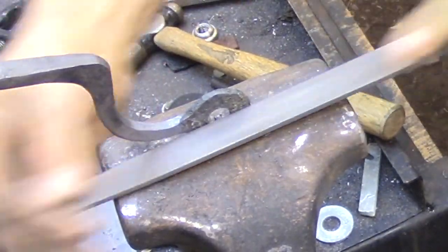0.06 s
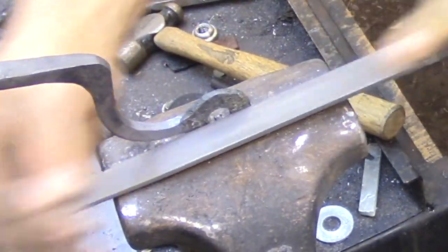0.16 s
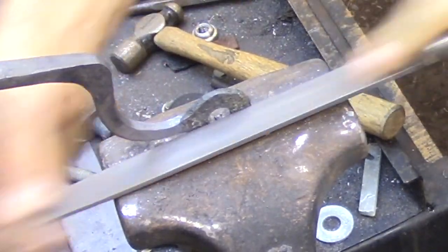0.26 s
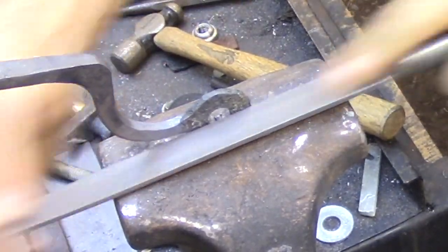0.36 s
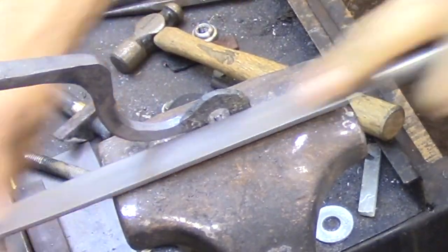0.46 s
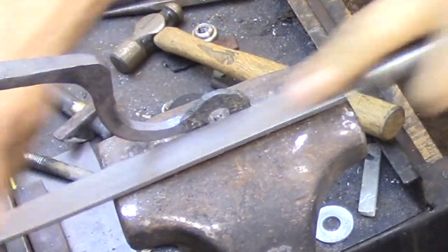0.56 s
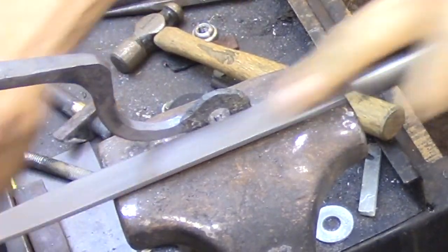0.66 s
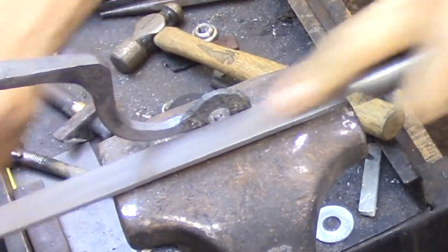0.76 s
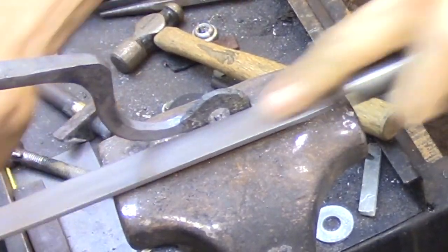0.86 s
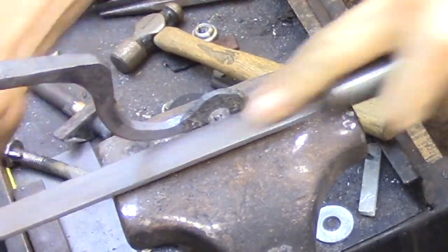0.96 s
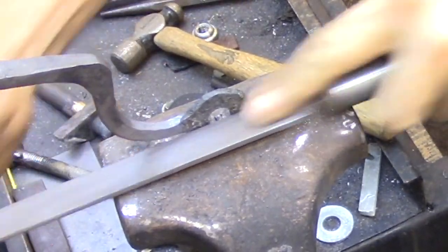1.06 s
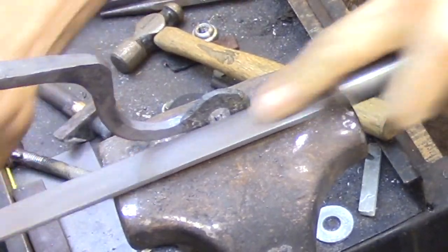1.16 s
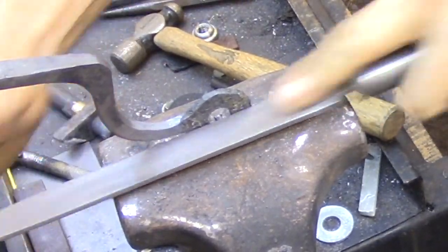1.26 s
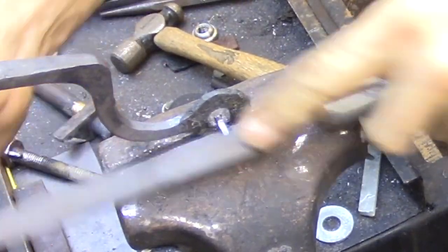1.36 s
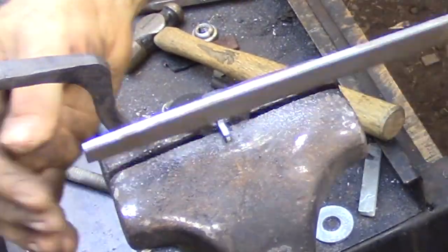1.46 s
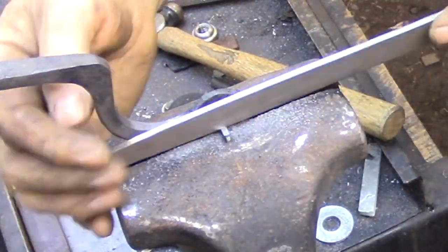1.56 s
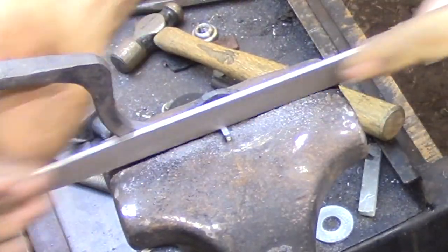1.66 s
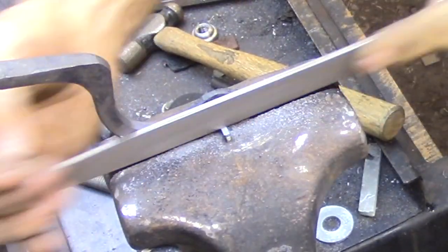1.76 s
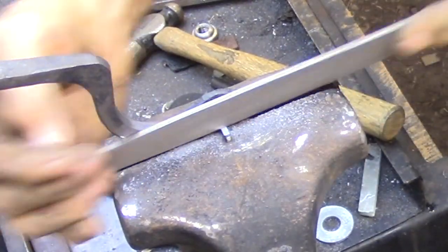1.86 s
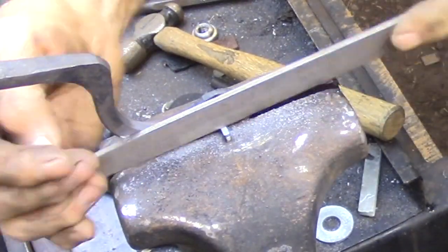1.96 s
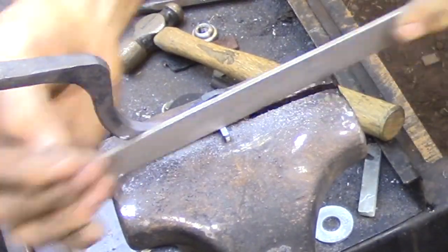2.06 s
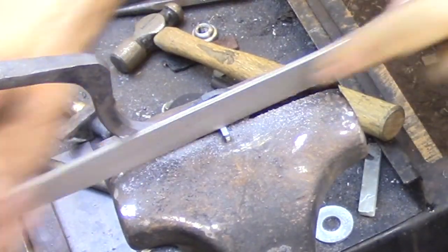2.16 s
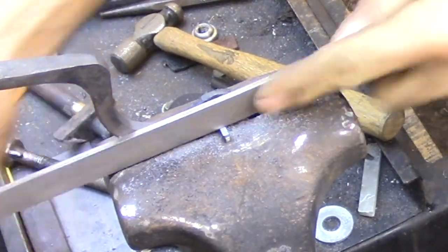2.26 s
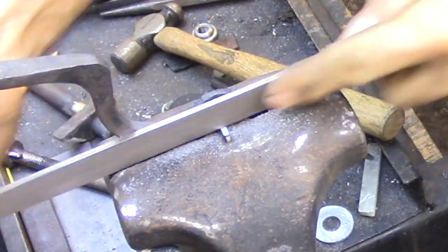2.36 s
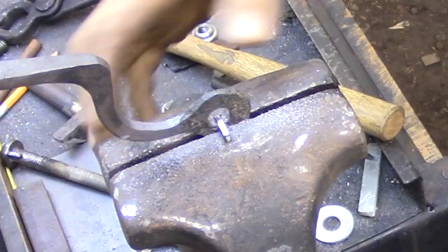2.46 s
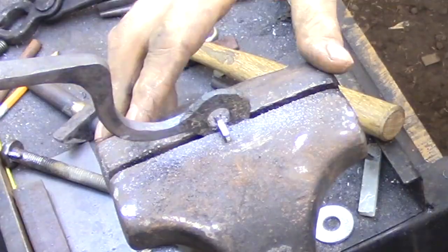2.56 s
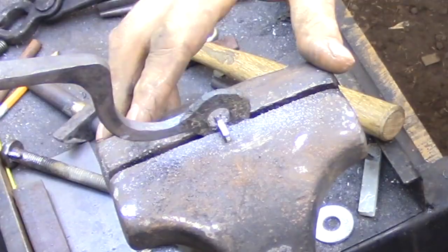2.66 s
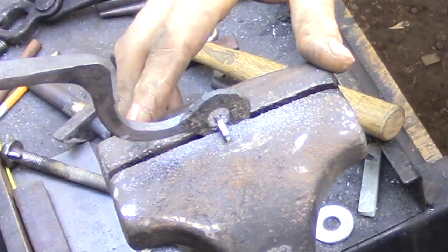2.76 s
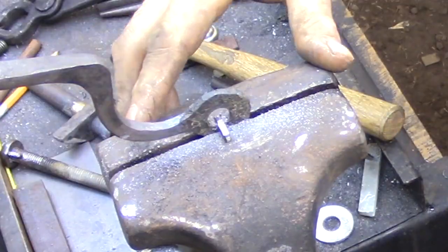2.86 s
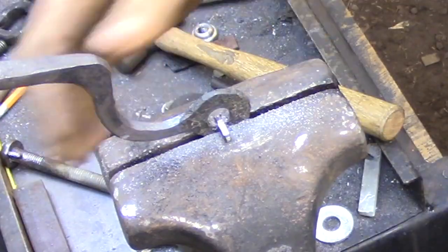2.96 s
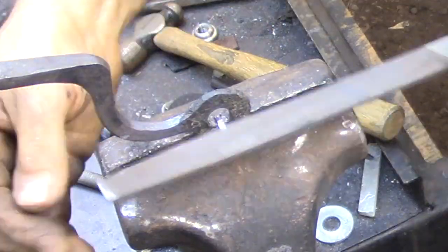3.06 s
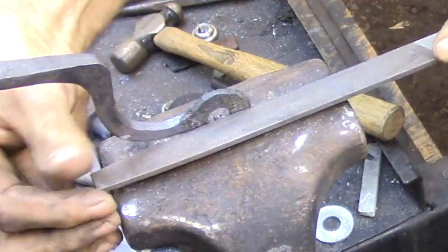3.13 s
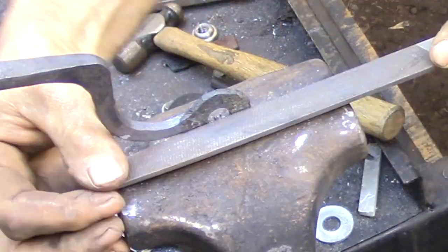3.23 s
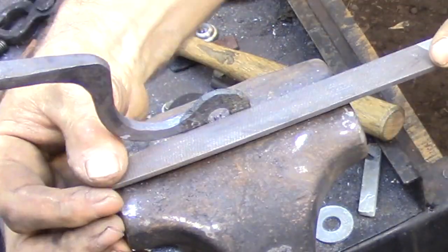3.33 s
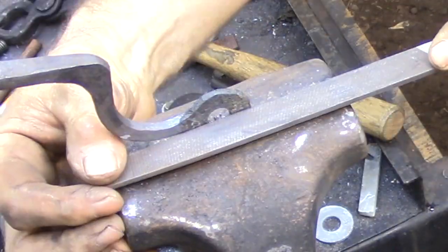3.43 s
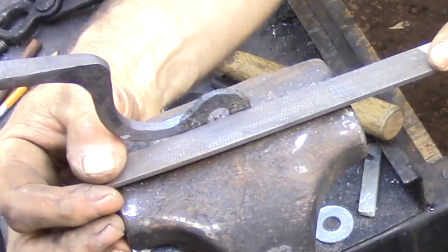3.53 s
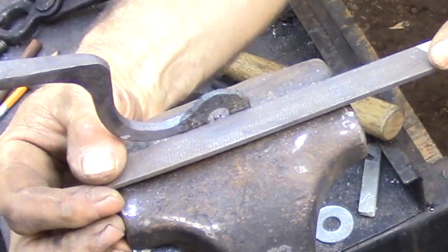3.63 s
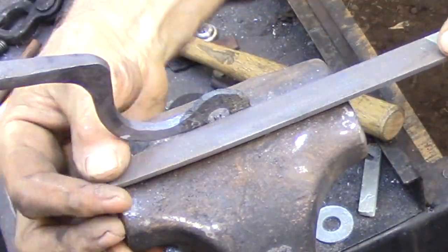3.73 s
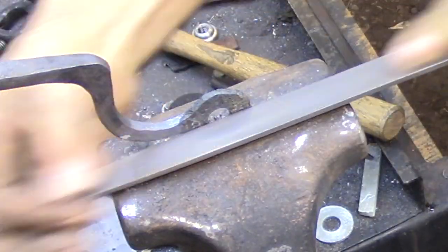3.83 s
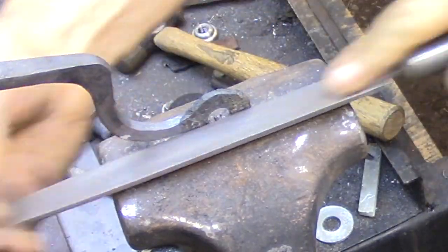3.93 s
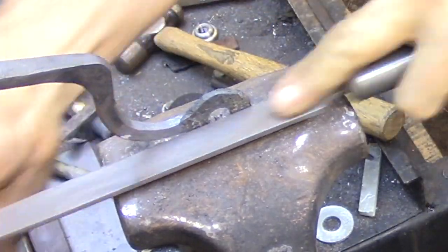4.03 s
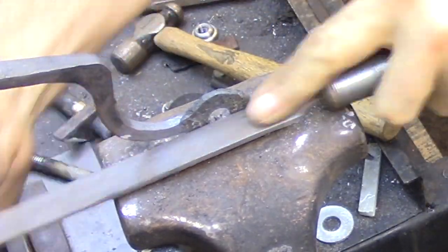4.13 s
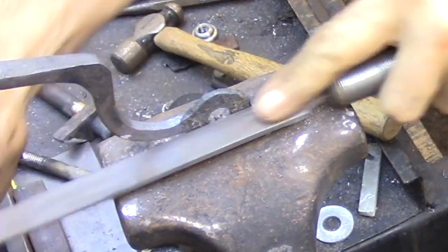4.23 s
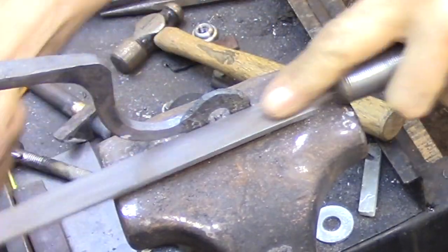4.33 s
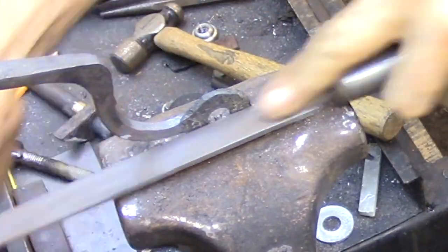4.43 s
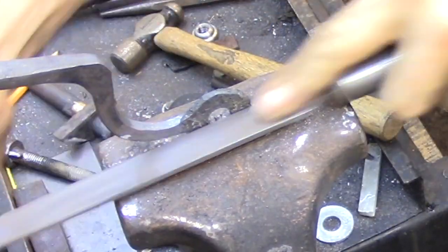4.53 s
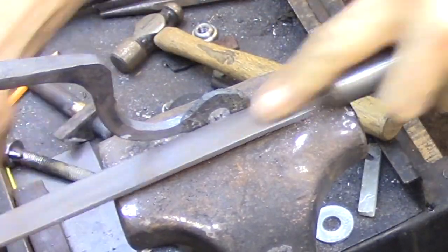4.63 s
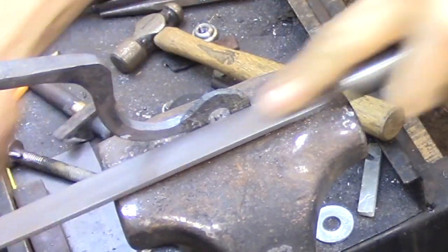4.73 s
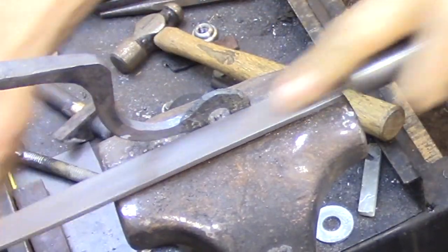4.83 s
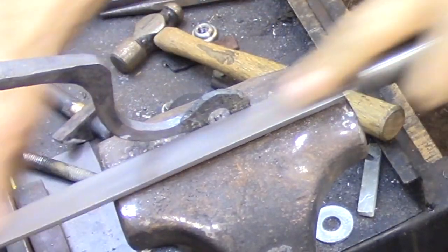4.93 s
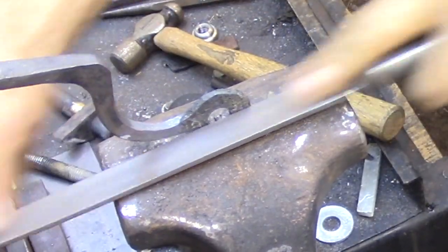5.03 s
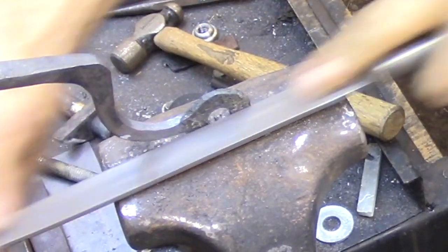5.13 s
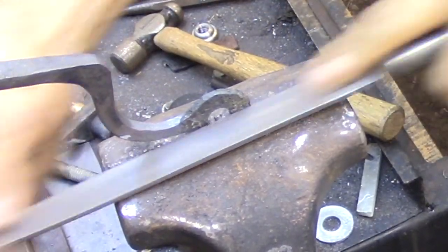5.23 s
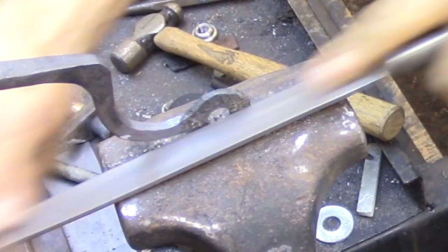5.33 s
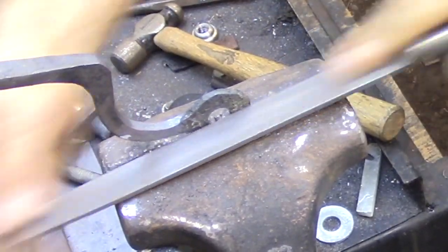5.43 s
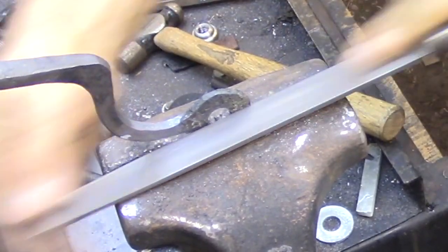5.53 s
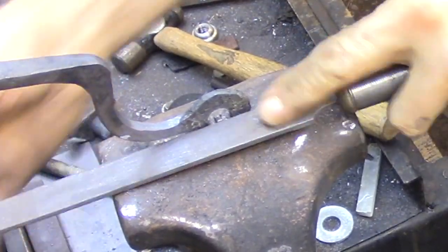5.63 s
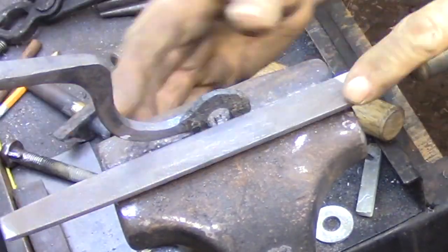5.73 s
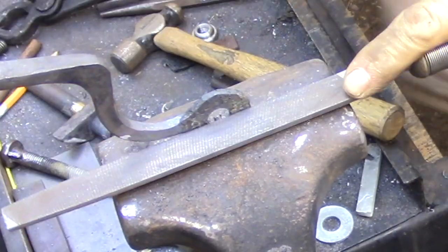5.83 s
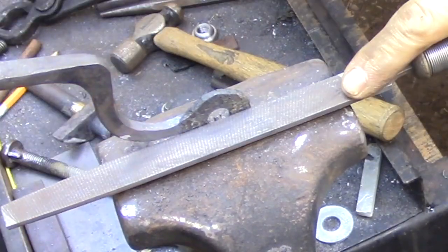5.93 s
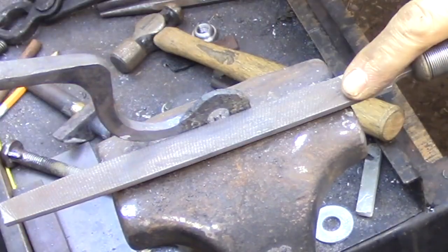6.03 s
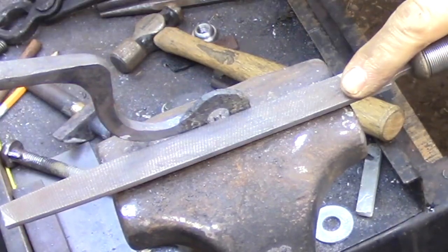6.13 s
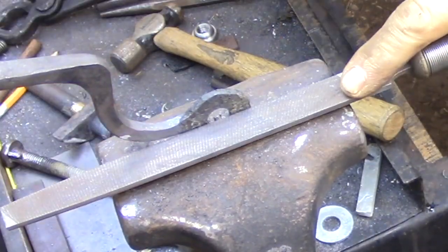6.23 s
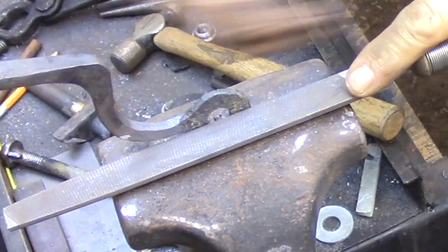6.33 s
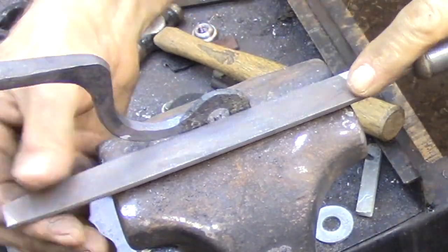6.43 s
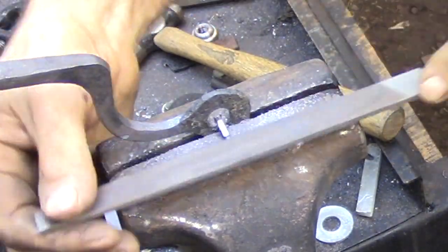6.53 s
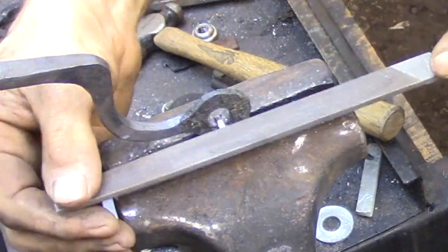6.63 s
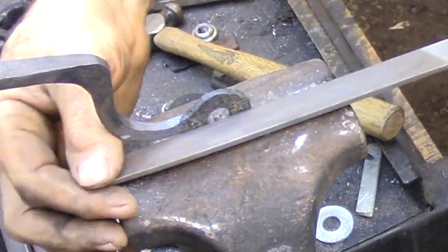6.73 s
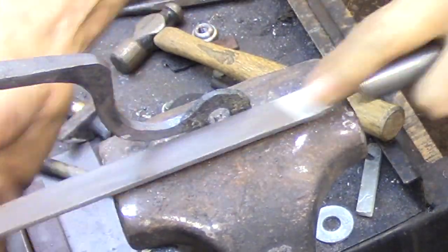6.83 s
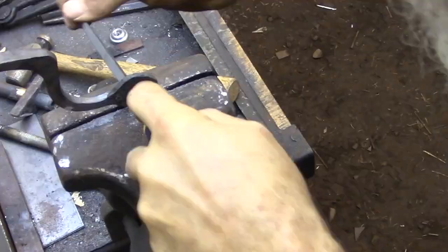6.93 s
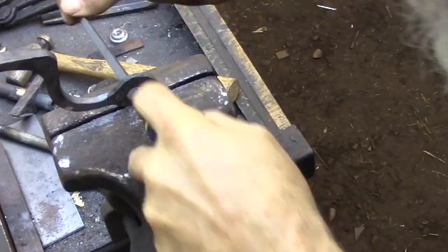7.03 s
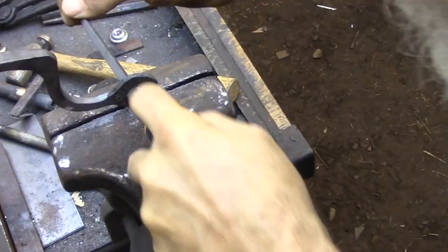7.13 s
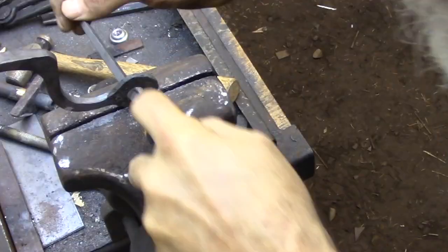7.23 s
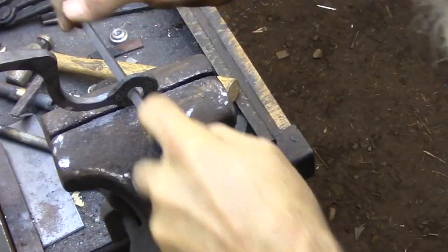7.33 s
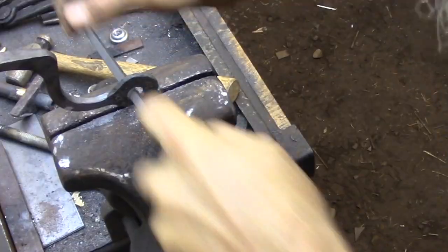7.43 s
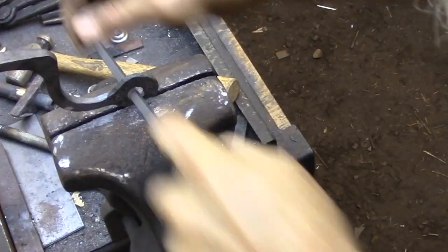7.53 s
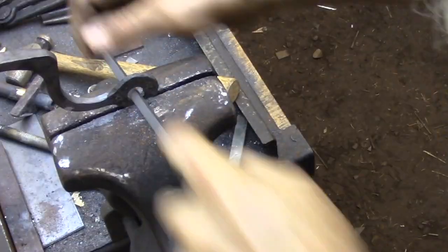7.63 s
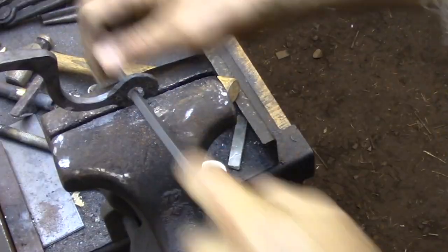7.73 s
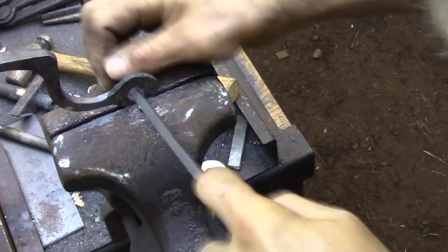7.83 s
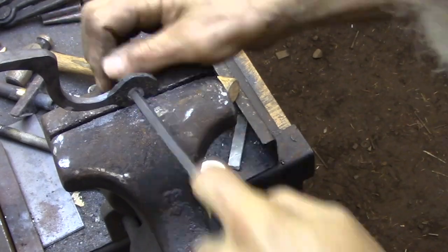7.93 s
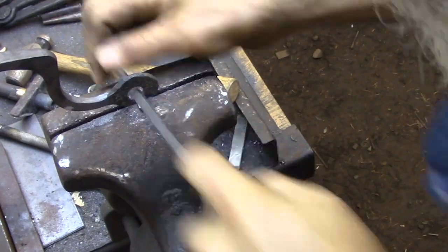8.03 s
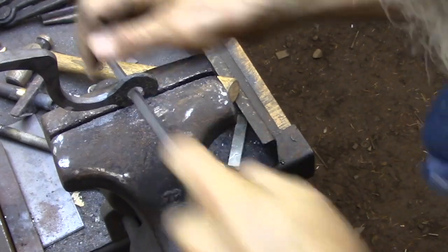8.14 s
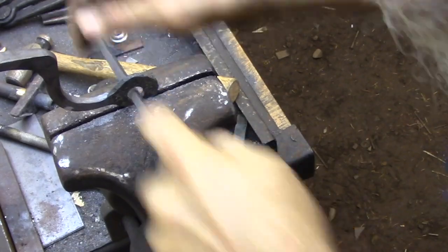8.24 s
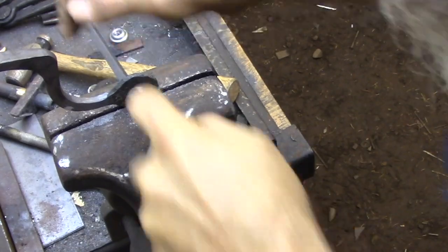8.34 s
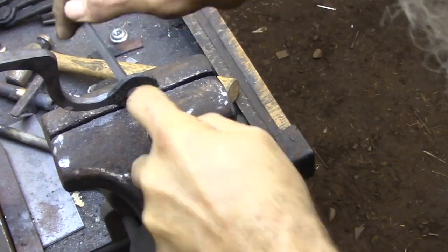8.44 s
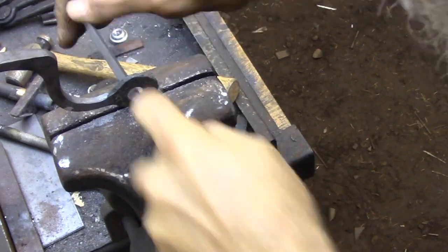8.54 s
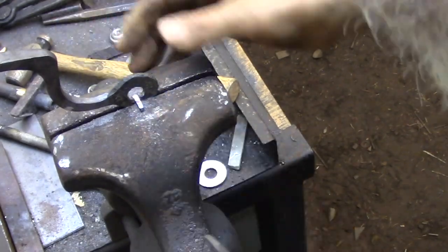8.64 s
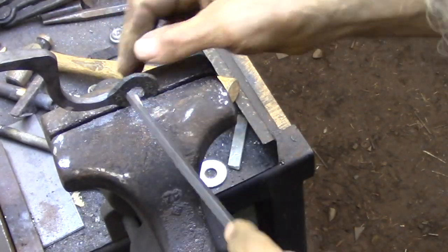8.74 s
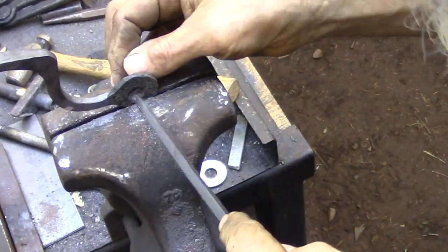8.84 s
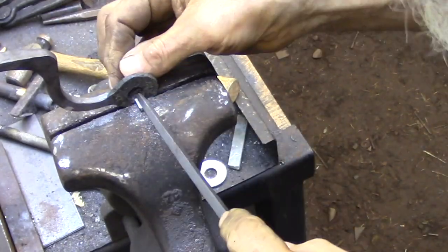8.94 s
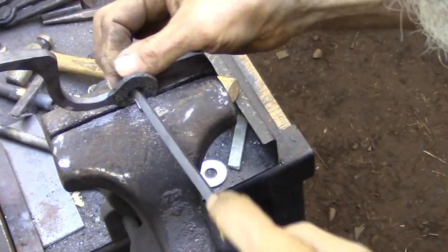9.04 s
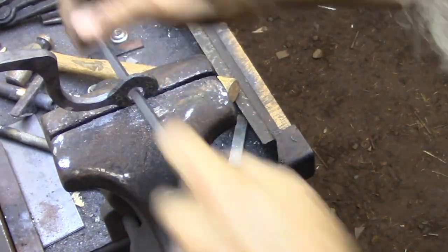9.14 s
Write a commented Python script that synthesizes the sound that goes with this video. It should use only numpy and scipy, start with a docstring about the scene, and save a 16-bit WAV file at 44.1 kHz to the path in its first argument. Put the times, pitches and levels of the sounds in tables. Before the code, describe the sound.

A flat file rasps fast back and forth on clamped iron over a humming motor, then a thin file makes the iron ring in sudden quiet.

```python
"""A flat file rasps quickly to and fro on forged iron in a vise, close to the microphone, over a humming motor.
Its runs are flat, tilted, then flat again; chatter squeaks in pitch and knocks on the iron break in.
The motor is suddenly gone around 7 s, as a thin needle file works the hole and makes the iron ring.
Filing is random bites and tooth whistle, shaped by strokes and filtered by the resonances of file and iron;
knocks are decaying modes and noise, the motor sine lines and noise, the quiet shop faint whine and air."""
import sys
import numpy as np
from scipy import signal
from scipy.fft import rfft, irfft, next_fast_len
from scipy.io import wavfile
from scipy.ndimage import map_coordinates

SR = 44100
rng = np.random.default_rng(int(sys.argv[2]) if len(sys.argv) > 2 else 0)


def generate_wav(sig):
    """Save sig (samples, or channels by samples) to the path in sys.argv[1] as 16-bit PCM at SR."""
    pcm = np.round(np.clip(np.atleast_2d(sig).T, -1, 1) * 32767).astype(np.int16)
    wavfile.write(sys.argv[1], SR, pcm)


N = 405279


def amp(db):
    """Decibels to gain."""
    return 10 ** (np.asarray(db) / 20)


def unit(x):
    """Scale to rms 1."""
    return x / np.sqrt(np.mean(x ** 2) + 1e-20)


def curve(rows):
    """Rows of seconds and value, as one value per sample."""
    return np.interp(np.arange(N) / SR, *np.transpose(rows))


def wobble(rate, size=N):
    """A smooth random curve with rate knots a second."""
    knots = rng.standard_normal(int(size * rate / SR) + 4)
    return map_coordinates(knots, [np.arange(size) * rate / SR])


def add(track, s, sound):
    """Mix a sound into a track at s seconds."""
    part = track[max(round(s * SR), 0):][:len(sound)]
    part += sound[:len(part)]


def body(x, colour, modes=(), size=8192):
    """Minimum-phase filter: a broad colour with ringing resonances on top."""
    hz = np.fft.rfftfreq(size, 1 / SR)
    colour_hz, colour_db = np.transpose(colour)
    db = np.interp(np.log(hz + 1), np.log(colour_hz), colour_db)
    db = db + sum(height / (1 + (2 * (hz - centre) / width) ** 2) for centre, width, height in modes)
    # folding the cepstrum forward makes the filter causal
    cepstrum = irfft(np.log(amp(db)))
    cepstrum[1:size // 2] *= 2
    cepstrum[size // 2 + 1:] = 0
    impulse_response = irfft(np.exp(rfft(cepstrum)))
    return signal.oaconvolve(x, impulse_response)[:N]


def lowpass(x, hz, order):
    """Keep what lies under hz, without delay; a higher order cuts more steeply."""
    padded = next_fast_len(N + SR // 4)
    gain = 1 / (1 + (np.fft.rfftfreq(padded, 1 / SR) / hz) ** order)
    return irfft(rfft(x, padded) * gain, padded)[..., :N]


def flat_file():
    """Broad strokes, flat and tilted, ring file and iron; the flat ones also swing the iron's free end."""
    # Runs of strokes, the pace steady between rows. Each row: time in seconds, strokes done (even push, odd pull).
    flat_runs, tilted_runs = [
        [(0, 0), (0.088, 2), (0.711, 14), (1.214, 24), (1.411, 28)],
        [(3.815, 1), (4.141, 7), (5.567, 36), (5.675, 38)],
        [(6.832, 0), (6.888, 1), (6.933, 2), (6.992, 3)],
    ], [
        [(1.615, 1), (1.655, 2), (1.754, 4), (1.987, 9), (2.378, 18), (2.485, 20)],
    ]
    # How hard the file is worked. Each row: time in seconds, effort in dB.
    flat_effort, tilted_effort = [(0, -46.5), (0.14, -49), (0.8, -47.5), (1.2, -46.5), (1.4, -52.5),
                                  (3.83, -54), (3.91, -48.5), (4.15, -50.5), (4.8, -50), (5.07, -48),
                                  (5.25, -51.5), (5.59, -50.5), (5.66, -54), (6.85, -49.5)], [(1.63, -61), (1.68, -47.5), (1.96, -47), (2.36, -47),
                                                       (2.46, -46.5)]
    # Broad colour of the contact. Each row: frequency in Hz, level in dB.
    flat_colour, tilted_colour = [(300, -29), (900, 1.5), (2200, 2), (4000, -19), (6500, 5), (9000, -0.6),
                                  (15000, 3.5)], [(300, -27), (900, -4), (2200, -6.5), (4000, -2),
                                                       (6500, -2), (9000, 5), (15000, 1.2)]
    # Resonances of file and iron together. Each row: centre in Hz, width in Hz, height over the colour in dB.
    flat_modes, tilted_modes = [(1252, 100, 8), (1451, 27, 13.5), (2785, 41, 15), (3240, 343, 23.5),
                                (3850, 386, 19), (4185, 423, 20.5), (4537, 110, 10), (5220, 670, 12.5),
                                (6290, 135, 7.5), (7573, 77, 13), (8700, 85, 9), (9620, 24, 7),
                                (10970, 300, 6.5), (14995, 59, 10)], [(1241, 105, 18.4), (1600, 440, 7.2), (3150, 520, 9.4),
                                                    (4090, 440, 9), (4610, 55, 7.2), (5350, 290, 9.5),
                                                    (6300, 140, 12.5), (6890, 400, 12), (9850, 46, 6.4),
                                                    (14900, 170, 11)]
    # How strongly the free end is set swinging. Each row: time in seconds, relative level in dB.
    swing_level = [(4.1, -5), (4.8, 9.5), (5.3, 14), (6.7, -11)]

    flat_strokes = to_and_fro(flat_runs, flat_effort, lead_db=3.0, weight_db=-51.0,
                              drag_db=1.2, push_longer=-0.03)
    tilted_strokes = to_and_fro(tilted_runs, tilted_effort, lead_db=1.5, weight_db=-47.5,
                                drag_db=0.5, push_longer=-0.08)
    flat = rasp(strokes_of(flat_strokes, skew=.82, fullness=0.39),
                pass_hz=5930, regular=0.13, split_hz=4700, grip_db=2.1)
    tilted = rasp(strokes_of(tilted_strokes, skew=.82, fullness=0.73),
                  pass_hz=4460, regular=0.09, split_hz=5000, grip_db=1.2)
    swing = body(flat * amp(curve(swing_level)), [(1250, -32.5)], [(1272, 304, 41.7)])
    return body(flat, flat_colour, flat_modes) + body(tilted, tilted_colour, tilted_modes) + swing


def needle_file(ring_hz=1212, lag=0.0068):
    """Fine teeth scrape in the hole; each stroke pumps up the iron's bending mode, lag seconds behind."""
    # Runs of strokes, the pace steady between rows. Each row: time in seconds, strokes done (even push, odd pull).
    needle_runs = [
        [(6.974, 1), (7.007, 2), (7.205, 6), (7.491, 12), (7.724, 17), (8.281, 29), (8.591, 36), (8.653, 37)],
        [(9.122, 0), (9.182, 1)],
    ]
    # How hard the file is worked. Each row: time in seconds, effort in dB.
    needle_effort = [(6.98, -53.5), (7.04, -48.5), (7.2, -50.5), (7.57, -47), (8.1, -49), (8.55, -49),
                     (8.63, -48), (9.15, -53.5)]
    # Broad colour of the contact. Each row: frequency in Hz, level in dB.
    needle_colour = [(150, -38), (400, -15), (600, -13), (850, -3), (2500, -3.5), (6000, -4.5),
                     (10500, 2.5), (15000, -4.5)]
    # Resonances of file and iron together. Each row: centre in Hz, width in Hz, height over the colour in dB.
    needle_modes = [(1196.3, 84, 27), (1360, 140, 10.8), (2010, 260, 5.5), (3130, 230, 10.7),
                    (4055, 136, 7.1), (4470, 99, 5.3), (5312, 230, 8.6), (6060, 530, 12.3), (7120, 170, 4),
                    (7680, 220, 11), (9800, 55, 3.9), (10560, 560, 4.7), (12280, 180, 14)]

    strokes = to_and_fro(needle_runs, needle_effort, lead_db=4.5, weight_db=-48.5,
                         drag_db=1.3, push_longer=0.02, follows=0.64)
    motion = strokes_of(strokes, skew=.78, fullness=0.37)
    speed, _, push = motion
    force = rasp(motion, pass_hz=11430, regular=0.2, split_hz=2640, grip_db=1.0)
    # the bending mode rings more than it hisses, so the scrape dips there
    scrape = body(force, needle_colour, [*needle_modes, (ring_hz, 80, -7)])
    build_up = np.exp(-np.arange(SR // 10) / (lag * SR)) / (lag * SR)
    swell = signal.oaconvolve(push * speed ** .5, build_up)[:N]
    ring_level = amp(-1.8 + 1.9 * wobble(70))
    ring = ring_level * np.sin(2 * np.pi * ring_hz * np.arange(N) / SR + wobble(40))
    return scrape + handle_bumps(strokes), swell * ring


def to_and_fro(runs, effort_db, lead_db, weight_db, drag_db, push_longer, follows=0.41):
    """Strokes as (start s, length s, bite dB, weight dB, is a push).

    Pushes bite harder by lead_db, pulls weigh more by drag_db; push_longer is a share of a stroke.
    """
    strokes = []
    for run in runs:
        s, done = np.transpose(run)
        k = np.arange(done[0], done[-1] + 1)
        turns = np.interp(k + push_longer * (k % 2), done, s)
        way = .5 - k[:-1] % 2  # +.5 push, -.5 pull
        middles = (turns[:-1] + turns[1:]) / 2
        effort = np.interp(middles, *np.transpose(effort_db))
        scatter = 0.6 * rng.standard_normal(len(way))  # dB, one stroke against the next
        bite = effort + lead_db * way + scatter
        # the hand's weight follows the effort in part
        leaning = follows * (effort - np.median(effort_db, axis=0)[1])
        weight = weight_db + leaning - drag_db * way
        strokes += zip(turns[:-1], np.diff(turns), bite, weight, way > 0)
    return strokes


def strokes_of(strokes, skew, fullness, lag=.002, catch=0.0091, skate_db=-5):
    """Every stroke speeds up and slows to its turning point: speed, bite of the teeth, push of the hand."""
    speed, bite, push = np.zeros((3, N))
    for s, length, bite_db, weight_db, _ in strokes:
        t = np.arange(max(int(length * SR), 2)) / SR
        arc = np.abs(np.sin(np.pi * (t / t[-1]) ** skew))
        # the teeth skate for a moment, then catch
        catch_s = catch * np.exp(.25 * rng.standard_normal())
        skating = .5 - .5 * np.tanh((t - catch_s) / .0012)
        grip = amp(skate_db * skating)
        s = s + lag  # the file follows just after the hand sets off
        add(speed, s, arc)
        add(bite, s, amp(bite_db) * arc * grip)
        # a low fullness keeps the hand's weight on nearer to the turn
        add(push, s, amp(weight_db) * arc ** fullness * grip ** .5)
    return speed, bite, push


def rasp(motion, pass_hz, regular, split_hz, grip_db):
    """Force on the iron: the bite sets the treble, the push the body; the grip is uneven."""
    speed, bite, push = motion
    uneven_grip = unit(amp(grip_db * wobble(170)))
    impacts = tip_echo(teeth(speed, pass_hz, regular)) * uneven_grip
    low = lowpass(impacts, split_hz, order=6)
    force = bite * (impacts - low) + push * low
    return force - lowpass(force, 213, order=6)  # the heavy vise lets no bass out


def teeth(speed, pass_hz, regular, scatter_db=1.5):
    """Uneven bites, denser at speed, and a whistle of passing tooth rows that rises and falls each stroke."""
    hits = rng.random(N) < (1 + speed) / 5
    sizes = rng.standard_normal(N) * amp(scatter_db * rng.standard_normal(N))
    bites = unit(hits * sizes / np.sqrt(1 + speed))
    unsteady = 1 + .09 * wobble(20) + .07 * wobble(1500)
    pitch = pass_hz * np.minimum(speed, 1) ** .5 * unsteady
    whistle = unit(np.sin(2 * np.pi * np.cumsum(pitch) / SR))
    return unit(bites + regular * speed * whistle)


def tip_echo(x):
    """Each bite returns from the file's tip; the contact slides, so the echo's delay drifts."""
    delay = .0005 * SR * np.exp(.3 * wobble(18))  # around half a millisecond, in samples
    echo = map_coordinates(x, [np.arange(N) - delay])
    return unit(x + .38 * echo)


def handle_bumps(strokes, hz=415, db=-74.0, width=0.008, scatter_db=2.3):
    """The needle file's handle bumps dully and unevenly, as resonant noise, each time it turns to push."""
    jolts, t = np.zeros(N), np.arange(-SR // 20, SR // 20) / SR
    for s, *_, pushes in strokes:
        if pushes:
            level = amp(db + scatter_db * rng.standard_normal())
            add(jolts, s + t[0] - width / 2, level * np.exp(-(t / width) ** 2 / 2))
    colour = [(100, -33), (400, -0.5), (850, 3), (1600, -25), (4000, -60)]  # Hz, dB
    handle = body(rng.standard_normal(N), colour, [(hz, 90, 13)])
    return jolts * unit(handle)


def chatter(width=0.0045, fall=0.0225, rough=0.03, throb_db=3):
    """Teeth lock briefly onto a resonance: a rough squeak that falls in pitch."""
    # Each row: time in seconds, level in dB before a common cut of 11 dB, middle pitch in Hz.
    squeaks = [(0.0189, -36, 5970), (0.0553, -35, 6530), (0.4783, -30, 6400), (0.835, -35, 6110),
               (0.9842, -35, 6380), (1.047, -23.5, 6230), (1.2468, -22.5, 6070), (1.776, -34, 4500),
               (4.7207, -28.5, 6140), (5.0518, -29.5, 6680), (5.1103, -26, 6180), (5.4081, -30, 6010),
               (8.632, -33.5, 6300)]
    out, t = np.zeros(N), np.arange(-SR // 40, SR // 40) / SR
    for s, db, hz in squeaks:
        pitch = hz * (1 - fall * np.tanh(t / width) + rough * wobble(900, size=len(t)))
        swell = np.exp(-(t / width) ** 2 / 2) * amp(throb_db * wobble(285, size=len(t)))
        squeak = swell * np.sin(2 * np.pi * np.cumsum(pitch) / SR)
        add(out, s + t[0] + 0.0024, amp(db - 11.0) * squeak)
    return out


def knocks(scrape_t60=0.094, scrape_db=-6, attack=0.0065, tick_db=-3, tick_t60=0.01):
    """The file lands with a tick and short scrape; heavy landings wake the lowest mode, hard ones the upper."""
    # Each row: start in seconds, overall level in dB, lowest mode in relative dB, upper modes in relative dB.
    landings = [(1.567, -52, -12, -12), (1.586, -49, -7, -8), (2.612, -53, -15, -12),
                (3.156, -44.5, 6.5, -6), (3.322, -48.5, -8, -3), (3.466, -55, -12, -10),
                (5.754, -38.5, 4.5, 4), (5.833, -46.5, -17, -14), (6.767, -47, -12, -10),
                (8.826, -60, 8, -6), (8.897, -68, 9.5, -16), (9.034, -65, 9.5, -13),
                (9.052, -62.5, -2, -14)]
    # The struck iron's modes, lowest first. Each row: frequency in Hz, relative level in dB, t60 in seconds.
    iron_modes = [(1247, -5.5, .13), (1997, 0, 0.076), (3230, -14.5, 0.074), (4400, 0, 0.055),
                  (5430, -10, 0.049), (6070, 0, 0.037), (7515, -7, 0.051), (9600, -20, 0.11)]
    ringing, scraping = np.zeros((2, N))
    t = np.arange(SR // 3) / SR
    for s, db, low_db, upper_db in landings:
        ring = np.zeros(len(t))
        for k, (hz, level, t60) in enumerate(iron_modes):
            mode_db = level + (upper_db if k else low_db) + rng.normal(0, 1)
            ring += amp(mode_db - 60 * t / t60) * np.sin(2 * np.pi * (hz * t + rng.random()))
        add(ringing, s, amp(db) * ring * (1 - np.exp(-t / attack)))
        contact = amp(scrape_db - 60 * t / scrape_t60) + amp(tick_db - 60 * t / tick_t60)
        add(scraping, s, amp(db) * contact * rng.standard_normal(len(t)))
    return ringing + body(scraping, [(200, -33), (3500, 3.5), (15000, -1.5)])


def bench(x, t60):
    """Dense short ringing of the vise, the tools and the bench around the work, as decaying noise."""
    t = np.arange(SR // 4) / SR
    tail = rng.standard_normal(len(t)) * amp(-60 * t / t60)
    return signal.oaconvolve(x, tail / np.linalg.norm(tail))[:N]


def motor():
    """A machine in the shop until it suddenly stops: hum lines over air rushing through its housing."""
    # Each row: time in seconds, hum frequency in Hz.
    hum_speed = [(0.0, 547.5), (4.08, 543.5), (5.05, 551), (6.06, 548), (6.95, 548.5)]
    # Each row: multiple of the hum frequency, level in dB.
    hum_orders = [(.4, -100), (.6, -93.5), (.88, -85.5), (1, -70), (1.41, -83.5), (2, -67), (3, -65),
                  (4.28, -69)]
    # Colour of the rushing air. Each row: frequency in Hz, level in dB.
    rush_colour = [(100, -87), (180, -90), (260, -74), (600, -61.5), (800, -56.5), (2800, -50),
                   (6000, -57.5), (12000, -66.5), (15500, -75)]
    # Housing resonances. Each row: centre in Hz, width in Hz, height over the colour in dB.
    housing_modes = [(1079, 166, 12.5), (1674, 343, 14.06), (2311, 72, 8.3), (3113, 220, 7.4),
                     (4000, 154, 3.5), (5120, 115, 8.1)]
    stop, fade = 6.985, 0.018  # s, the middle and length of the fade

    phase = 2 * np.pi * np.cumsum(curve(hum_speed) * (1 + .0015 * wobble(15))) / SR
    hum = sum(amp(db + 1.65 * wobble(12)) * np.sin(k * phase) for k, db in hum_orders)
    rush = body(rng.standard_normal(N), rush_colour, housing_modes) * amp(0.46 * wobble(9))
    running = np.clip((stop - np.arange(N) / SR) / fade + .5, 0, 1)
    return (hum + rush) * running


def quiet_shop():
    """The quiet workshop: faint whine lines and air noise, with a part that differs from side to side."""
    # Each row: frequency in Hz, level in dB.
    whine_lines = [(250, -98.5), (958, -88.5), (1443, -77)]
    # Colour of the air. Each row: frequency in Hz, level in dB.
    air_colour = [(25, -99.5), (150, -89), (260, -85), (600, -74), (1300, -68), (3000, -76), (9000, -83.5),
                  (15000, -85)]
    t = np.arange(N) / SR
    whine = sum(amp(db + wobble(10)) * np.sin(2 * np.pi * hz * t + .5 * wobble(12)) for hz, db in whine_lines)
    side = body(rng.standard_normal(N), [(60, -101), (500, -81.5), (9000, -97)])
    air = body(rng.standard_normal(N), air_colour)
    return whine + air + np.array([side, -side])


def scene():
    """The work is central and nearly mono; the needle file lies a touch to the left."""
    needle, ring = needle_file()
    work = flat_file() + needle + chatter() + knocks()
    mid = work + ring + amp(-6.5) * bench(work, t60=0.075) + motor()
    spread = body(bench(mid, t60=0.029), [(300, -18), (1500, -56.5), (9000, -30.5)])
    side = spread + amp(-40.5) * needle
    balance = amp([[.1], [-.1]])  # left, right
    return np.array([mid + side, mid - side]) * balance + quiet_shop()


def record(dry):
    """The microphone's chain has a steep band limit at 15850 Hz."""
    return lowpass(dry, 15850, order=200)


dry = scene()
out = record(dry)
generate_wav(out)
```